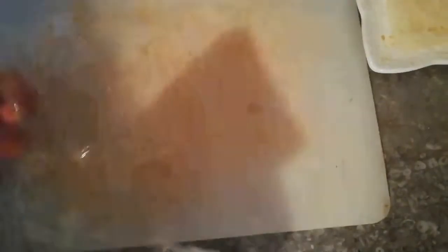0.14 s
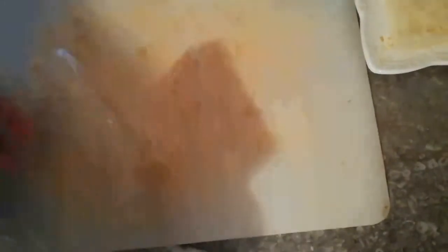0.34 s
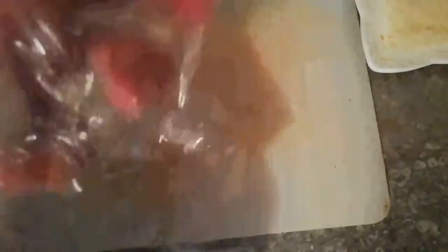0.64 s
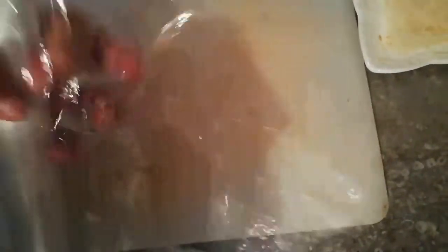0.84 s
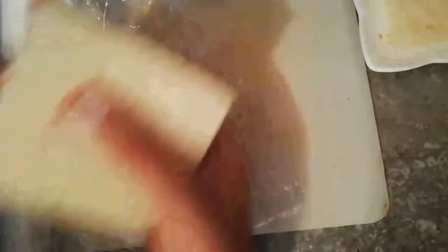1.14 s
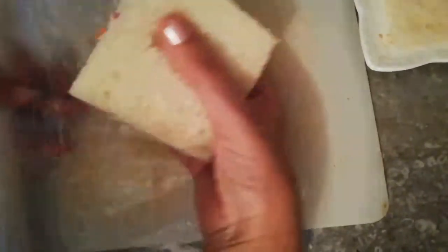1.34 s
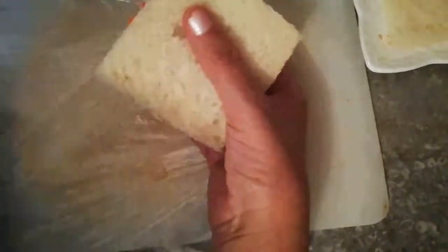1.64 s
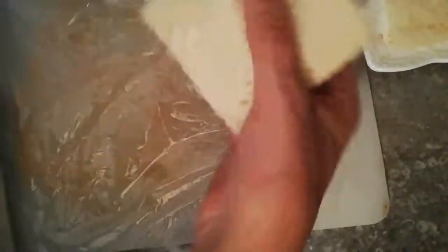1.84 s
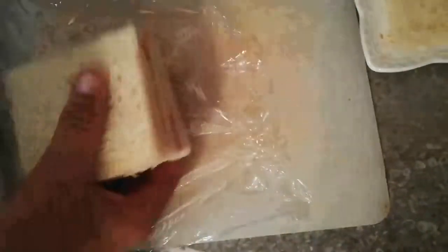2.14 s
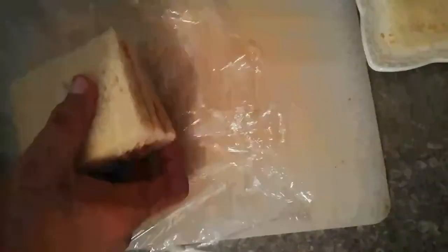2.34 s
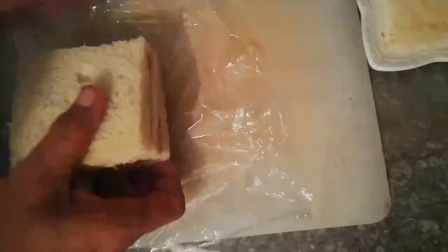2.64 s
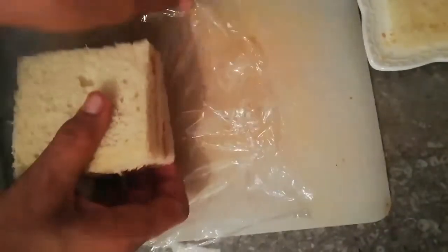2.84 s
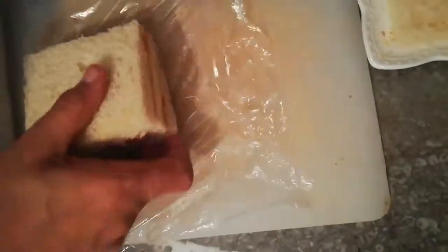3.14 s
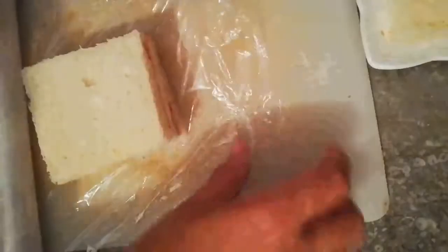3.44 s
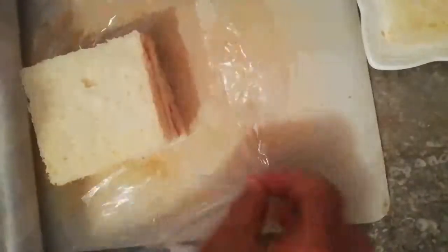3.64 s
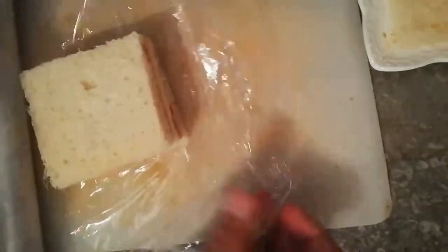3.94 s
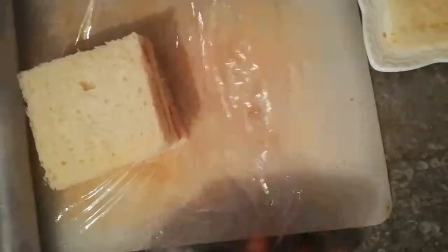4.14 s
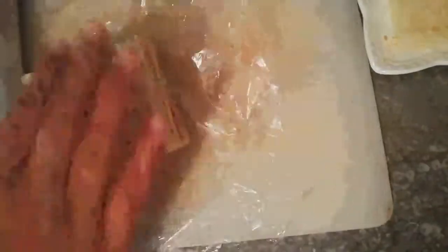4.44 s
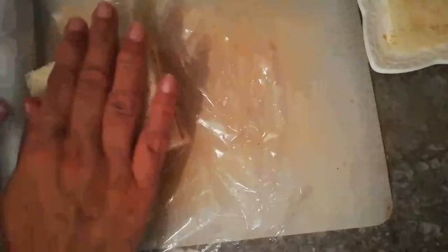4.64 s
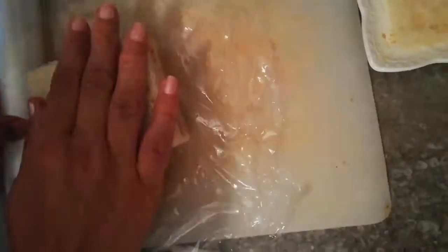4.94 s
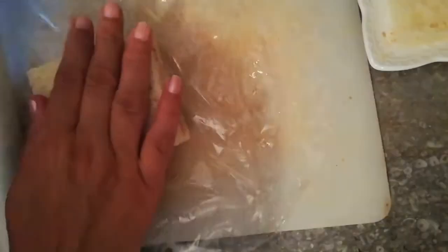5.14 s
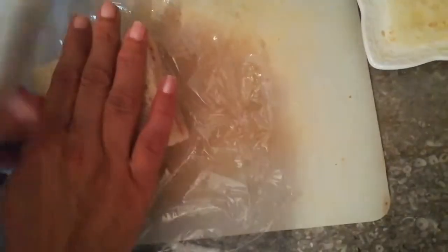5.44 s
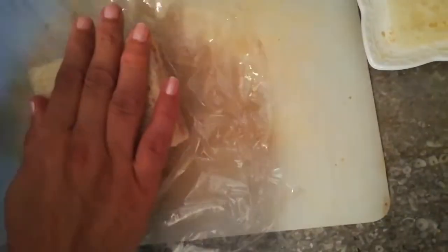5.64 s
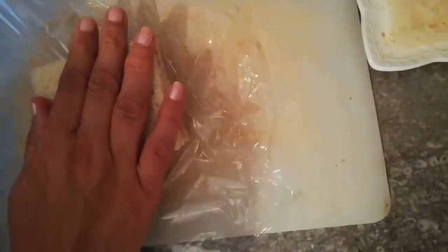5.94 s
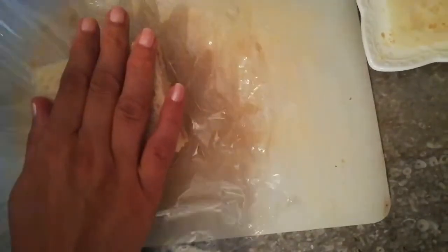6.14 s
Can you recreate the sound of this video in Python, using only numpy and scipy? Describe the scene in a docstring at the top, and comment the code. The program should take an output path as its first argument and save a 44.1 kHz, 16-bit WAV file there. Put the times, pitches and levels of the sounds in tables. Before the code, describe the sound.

Thin plastic film is pulled, spread and folded on a plastic board. Tiny snaps swarm in fits, with sharp single pops of flipping creases and a duller rubbing underneath. Early hollow metallic clanks ring briefly; light knocks and soft thuds follow. After a quieter middle the crackle returns in clusters near the end. Close phone pickup, short hard room echo, faint hiss and drifting low rumble.

```python
"""Cling film crackles as it is pulled off its roll, spread on a board and folded around a sandwich near a phone.
The crackle is swarms of tiny random snaps, single creases flipping, and folds collapsing in dense bursts.
The film also rubs on the board. The roll clanks on metal (ringing tones and noise); hands knock (noise and
short tones) and thud (low tones); bread lands with filtered noise.
A small hard kitchen answers many of these sounds, over steady room noise and a drifting low rumble."""
import sys
import numpy as np
from scipy import signal
from scipy.fft import rfft, irfft, next_fast_len
from scipy.io import wavfile
from scipy.ndimage import uniform_filter1d, map_coordinates

SR = 44100
rng = np.random.default_rng(int(sys.argv[2]) if len(sys.argv) > 2 else 0)


def dump_mix(stems):
    """Bounce the given channels to the path in sys.argv[1] as a 16-bit WAV at rate SR."""
    frames = np.atleast_2d(stems).T  # one column per channel
    limited = np.clip(frames, -1, 1)  # hard clip at full scale
    pcm = np.round(limited * 32767).astype(np.int16)
    wavfile.write(sys.argv[1], SR, pcm)


N = 277962  # length in samples

# Levels in the tables are starting values: trims, filters and the room may shift them later.
# Hand moves, from pulling film off the roll to drawing it tight. Attack and release each span SWING_DB:
# full_strain_s, attack_s, hold_s, release_s, crinkle_db, drag_db
HAND_MOVES = [ (.005, 0.025, .015, 0.081, -42.5, -56), (0.082, .15, 0.016, 0.29, -46, -65),
              (0.243, 0.0265, 0.03, 0.071, -37, -70), (.35, .1, .02, 0.31, -50, -59),
              (0.471, 0.15, 0.017, 0.22, -45.5, -61.5), (0.622, 0.58, 0.3167, .17, -51.5, -66),
              (1.335, .16, .125, 0.16, -37.5, -51.5), (1.471, 0.11, 0.013, 0.21, -32.5, -45.5),
              (1.683, 0.13, 0.019, 0.19, -50, -64.5), (2.222, 0.042, 0.028, 0.11, -53.5, -66),
              (2.334, .1, .02, .11, -53, -70.5), (2.43, 0.092, .11, 0.049, -61, -74),
              (2.763, 0.11, 0.14, 0.25, -47.5, -62.5), (2.951, 0.14, 0.032, 0.18, -45.5, -61.5),
              (3.211, 0.16, 0.033, 0.1, -49, -56.5), (3.29, .1, 0.11, 0.025, -55.5, -77),
              (3.454, 0.012, 0.13, 0.066, -48, -51.5), (3.629, 0.17, 0.1758, 0.13, -44, -56),
              (3.974, 0.11, 0.1153, 0.041, -44, -56), (4.607, 0.049, 0.0077, .06, -49, -45),
              (4.644, 0.147, 0.0137, .16, -51.5, -56), (4.753, 0.067, 0.019, 0.23, -60.5, -52),
              (4.872, 0.015, .05, 0.12, -51, -65), (5.024, 0.023, 0.05, 0.12, -41.5, -51),
              (5.168, 0.083, .09, 0.17, -48.5, -57), (5.286, 0.046, .008, 0.095, -37.5, -50),
              (5.426, 0.069, 0.061, 0.29, -45, -49.5), (5.611, 0.033, 0.012, 0.11, -42.5, -55),
              (5.677, .1, 0.022, 0.15, -50, -56.5), (5.935, .015, 0.0555, 0.15, -58.5, -64.5),
              (6.103, 0.091, 0.021, 0.17, -50.5, -58), (6.184, 0.114, 0.054, 0.18, -55.5, -70), ]
# Creases flipping at set times: start_s, level_db, left_minus_right_db
CREASE_FLIPS = [(0.3416, -22.5, 16), (0.4237, -24, 14), (.601, -28, 11), (0.6832, -20, 9.5),
                (.8486, -31.5, 21), (1.288, -28, 16.5), (1.326, -25, 25.5), (1.337, -24, 20),
                (1.3658, -21, 17), (1.3932, -19.5, 17), (1.4196, -12, 12), (1.459, -14.5, 8),
                (1.4855, -14, 9.5), (1.4944, -8, 13), (2.0852, -33.5, 19), (2.261, -33, 12),
                (2.7706, -24, -2), (2.89, -27.5, 21.5), (2.957, -26.5, -8), (3.1313, -29.5, 20.5),
                (3.651, -23.5, 19), (3.711, -29, 19), (3.7971, -25, 16.5), (3.954, -28.5, 26),
                (4.0541, -15.5, 15), (4.46, -49, 28), (4.829, -40, 5), (5.039, -24, 3),
                (5.0963, -19.5, 14.5), (5.103, -21, 11), (5.2374, -26, 13), (5.404, -29, 13),
                (5.4397, -17, 0), (5.4502, -14, 17), (5.5712, -21.5, 4), (5.5784, -16.5, 7),
                (5.614, -15.5, 13), (5.63, -20, 7), (5.7252, -32, 7), (5.824, -35.5, 8.5)]
# Whole folds collapsing at once: start_s, level_db, length_s
FOLD_COLLAPSES = [(0.177, -29, 0.014), (0.888, -43, 0.0091), (1.329, -37, .012), (2.09, -43, 0.0045),
                  (2.885, -36, 0.013), (2.96, -37, 0.011), (4.031, -30.5, 0.032), (4.6, -36.5, 0.017),
                  (5.022, -38.5, 0.016), (5.081, -34.5, 0.027), (5.285, -34, 0.025), (5.436, -28.5, 0.011),
                  (5.445, -27, 0.012), (5.574, -30, 0.0074)]
# Crinkle colour on each side: pitch_hz, level_db (per Hz)
FILM_LEFT_SPECTRUM = [(150, -36), (500, -23), (1000, -10.5), (2000, -28), (3300, -8.5), (5000, -13),
                      (7000, -8.5), (8500, -4), (9600, 2), (10500, 1.5), (11300, -4), (12300, -8.5),
                      (13500, -12), (15500, -20)]
FILM_RIGHT_SPECTRUM = [(150, -23.5), (600, -26), (1200, -21), (2000, -18), (2600, -13), (4300, -10.5),
                       (6000, -11.5), (8200, -10.5), (10200, -10), (11500, -11), (13000, -16.5),
                       (15500, -20)]
# Colour of film rubbing on the board: pitch_hz, level_db (per Hz)
DRAG_SPECTRUM = [(150, -9.5), (450, -22.5), (750, -10), (1100, -3.5), (1450, -0.5), (1900, 0), (2600, -8),
                 (4300, -8.5), (7000, -12), (15000, -49)]
# How long the kitchen's echo takes to fall 60 dB: pitch_hz, decay_s
KITCHEN_DECAY = [(150, 0.697), (1000, 0.37), (4000, 0.39), (10000, 0.29), (16000, 0.19)]
# Drift of the low rumble: time_s, level_db, centre_hz
RUMBLE_DRIFT = [(0, -67, 233), (1.5, -62, 215), (2.2, -65, 150), (2.8, -57.5, 161), (3.6, -60, 183),
                (4.8, -62.5, 127.1), (5.35, -65, 340), (6.3, -66.5, 131.8)]
# Colour of the low rumble, and of the room's air: pitch_hz, level_db (per Hz)
RUMBLE_SPECTRUM = [(30, -15), (80, 9), (135, 3.5), (220, -3.5), (350, 0.5), (500, -12), (1000, -51),
                   (4000, -68)]
AIR_SPECTRUM = [(15, -3.5), (45, 4.5), (100, -5.5), (300, -25), (600, -30.5), (1500, -19.5), (3000, -22),
                (8000, -28.5), (15000, -35)]
# Colour of the room's hiss: pitch_hz, level_db (per Hz)
HISS_SPECTRUM = [(200, 10.5), (1800, 14.0), (4000, -5.5), (15000, -51)]
# Roll striking metal and chattering: start_s, level_db, clatter_above_ring_db
ROLL_CLANKS = [(0.1703, -35, 8.5), (.178, -22, -4), (.187, -27, -5), (.194, -37, 1), (.245, -41, -1),
               (0.8846, -31.5, 2.5), (.890, -40.5, 10.5), (.908, -50, 16)]
# Tones of the struck metal, with the time to fall 60 dB: pitch_hz, level_db, decay_s, left_minus_right_db
METAL_TONES = [(708, -14, 0.38, 6), (819, -12, 0.14, 6), (990, -6, 0.11, -6), (1020, -18, 0.39, 8.5),
               (1243, -15, 0.22, -13), (1350, -17, .2, -12), (1660, -10, 0.42, -6), (1682, -6.5, 0.34, -16),
               (1896, -17, 0.19, 3), (1880, -5, 0.16, -6), (2785, -7.5, 0.52, -7), (4131, -13, .24, -16),
               (5703, -11, .16, -12), (7530, -13.5, .15, -8)]
# Colour of the roll's hollow clatter: pitch_hz, level_db
CLATTER_SPECTRUM = [(60, -17), (200, -11), (450, -15), (720, -3.5), (1050, 1.5), (1400, -3.5), (1850, -0.5),
                    (2350, -15.5), (3300, -9.5), (4800, -19), (8000, -21.5), (15000, -75)]
# Soft thuds of the roll and the pressing palm, with 60 dB decays: start_s, level_db, pitch_hz, decay_s
SOFT_THUDS = [(.881, -27.5, 279.5, 0.06), (1.74, -36, 216, 0.045), (3.484, -42.5, 120.7, 0.2),
              (4.749, -50.5, 139, 0.61), (5.499, -33.5, 105, 0.067), (5.53, -31, 82.4, 0.105),
              (5.798, -34, 61, 0.15), (5.943, -35, 52.7, 0.22)]
# Light knocks on the board: start_s, level_db
BOARD_KNOCKS = [(1.235, -32), (1.739, -31.5), (1.835, -39.5), (2.085, -31.5), (2.117, -35), (2.77, -29),
                (3.457, -36.5), (3.484, -42), (4.556, -41), (4.748, -35), (5.029, -41), (5.44, -28.5),
                (5.577, -34)]
# Colour of the knocks: pitch_hz, level_db
BOARD_SPECTRUM = [(60, -1.5), (220, -2), (400, -6.5), (600, -7.5), (750, -2.5), (870, -4.5), (1000, 4.5),
                  (1400, -5), (1850, -7.5), (2500, -18.5), (5000, -26), (15000, -49)]
# Short tones of the board, with the time to fall 60 dB: pitch_hz, level_db, decay_s, left_minus_right_db
BOARD_TONES = [(745, -15.5, 0.17, 15), (980, -14.5, 0.069, 16), (1362, -18, .08, 0), (1860, -9, .06, -18)]
# Bread settling on the board, later pressed by the palm. Attack and release each span SWING_DB:
# full_weight_s, attack_s, hold_s, release_s, level_db
BREAD_MOVES = [(2.45, 0.059, 0.08, .08, -53), (5.5, .2, 0.088, 0.17, -71)]
# Colour of the bread's scuff: pitch_hz, level_db (per Hz)
BREAD_SPECTRUM = [(50, -22), (115, 1), (210, 2.5), (320, -0.5), (420, -18), (800, -30), (3000, -64)]

TOP_HZ = 15700  # nothing above this is kept
SWING_DB = 22  # rise over an attack, and fall over a release
REST_DB = -70  # lowest crinkle strength before fits: film left alone still creeps
# further creases flip at random, their level following the film's strain
STRAYS_PER_S, STRAY_DB, STRAY_SPREAD_DB, STRAY_PAN_DB = 14, 17.5, -0.5, 2.5
KNOCK_DECAY_S = 0.061  # time to fall 60 dB
BOARD_SCATTER_DB = 1.3  # random variation of each board tone


def amp(db):
    """Turn decibels into a gain."""
    return 10 ** (np.asarray(db) / 20)


def unit(x):
    """Scale to an average (rms) strength of 1."""
    return x / np.sqrt(np.mean(x ** 2) + 1e-20)


def along(points, hz):
    """Read values between table points, with pitch on a log scale."""
    pitch, value = np.transpose(points)
    return np.interp(np.log(hz + 1), np.log(pitch + 1), value)


def sides(db):
    """Left and right gains for a level difference."""
    return amp([[db / 2], [-db / 2]])


def add(track, s, sound):
    """Mix a sound into a track at time s."""
    start = max(round(s * SR), 0)
    part = track[:, start:start + sound.shape[-1]]
    part += sound[..., :part.shape[1]]


def fade(t, t60):
    """Fall by 60 dB in t60 seconds."""
    return np.exp(-np.log(1000) * t / t60)


def colour(x, points, size=4096):
    """Shape a sound's spectrum with a filter of unit energy that acts only forward in time."""
    # folding the cepstrum (spectrum of the log spectrum) packs the filter's energy at its start
    cepstrum = irfft(np.log(amp(along(points, np.fft.rfftfreq(size, 1 / SR)))))
    cepstrum[1:size // 2] *= 2
    cepstrum[size // 2 + 1:] = 0
    pulse = irfft(np.exp(rfft(cepstrum)))
    pulse = pulse / np.linalg.norm(pulse)
    pulse = np.reshape(pulse, (1,) * (x.ndim - 1) + (-1,))
    return signal.fftconvolve(x, pulse)[..., :x.shape[-1]]


def noise(count, spacing=0.24):
    """Noise from all around: two pickup points, spacing metres apart, share mainly the long waves."""
    alike = np.sinc(2 * np.fft.rfftfreq(count, 1 / SR) * spacing / 343)  # sound travels at 343 m/s
    spectra = rfft(rng.standard_normal((2, count))) * np.sqrt([1 + alike, 1 - alike])
    mid, side = irfft(spectra, count)
    return unit(np.array([mid + side, mid - side]))


def kitchen(x, wet_db, near_db, near_t60, count=20):
    """Hands and counter smear a sound at once; the walls answer later, along paths that change."""
    out, t, step = np.zeros((2, N)), np.arange(SR // 2) / SR, N // count + 1
    keep = fade(1 / SR, near_t60) ** 2
    near = np.sqrt(signal.lfilter([1 - keep], [1, -keep], x ** 2)) * noise(N)
    # each stretch of sound gets a new random echo
    for start in range(0, N, step):
        hz, s, z = signal.stft(noise(len(t)), SR, nperseg=256)
        decay = fade(s, along(KITCHEN_DECAY, hz)[:, None])
        walls = signal.istft(z * decay, SR, nperseg=256)[1][:, :len(t)]
        walls = walls * (1 - np.exp(-t / 0.00067))  # quick build-up
        walls = unit(walls) / np.sqrt(len(t))
        add(out, start / SR, signal.fftconvolve(x[:, start:start + step], walls, axes=1))
    return x + amp(near_db) * near + amp(wet_db) * out


def wobble(rate):
    """A smooth random curve through rate points a second."""
    return map_coordinates(rng.standard_normal(int(N * rate / SR) + 4), [np.arange(N) * rate / SR])


def stroke(s, attack, hold, release):
    """Gain of one movement: it swells, holds and dies away, evenly in dB."""
    t = np.arange(N) / SR - s
    away = np.maximum(-t, 0) / attack + np.maximum(t - hold, 0) / release
    return amp(-SWING_DB * np.minimum(away, 10))


def handling():
    """Take the strongest move at each moment as the strength of the crinkle, and of the drag."""
    crinkle, drag = np.full(N, amp(REST_DB)), np.zeros(N)
    for s, attack, hold, release, crinkle_db, drag_db in HAND_MOVES:
        strain = stroke(s, attack, hold, release)
        crinkle = np.maximum(crinkle, amp(crinkle_db) * strain)
        drag = np.maximum(drag, amp(drag_db) * strain)
    return crinkle, drag


def fits(slow_db=0.33, slow_per_s=30, clump_db=1.36, clumps_per_s=190):
    """Film gives way in fits and starts, made of short clumps of snaps: a gain around 1."""
    return amp(slow_db * wobble(slow_per_s) + clump_db * wobble(clumps_per_s))


def swarm(rate, spread_db, ring=0.2, ring_t60=0.0034, cap=1.5, aim_db=2, count=24, size=128):
    """Random snaps, mostly tiny: each is a push and the brief ring of its own facet."""
    rate = np.broadcast_to(rate, N)  # snaps per second
    at = np.flatnonzero(rng.random(N) < rate / SR)
    strength, pitch = rng.standard_normal(N)[at], rng.random(N)[at]
    turn = rng.choice([-1, 1], N)[at]  # push or pull
    aim = rng.standard_normal((2, N))[:, at]
    lag = rng.integers(count // 2, count, N)[at]  # samples
    t = np.arange(size) / SR
    facet = np.sin(2 * np.pi * TOP_HZ * pitch[:, None] * t)
    facet = facet * unit(fade(t, ring_t60)) * np.sqrt(2 / size)
    shape = np.sqrt(1 - ring) * (t == 0) + np.sqrt(ring) * facet
    # every snap radiates its own way and reaches the right side a little later
    level_db = spread_db * np.minimum(strength, cap) + aim_db * np.clip(aim, -1, 1)
    push = turn * amp(level_db) / np.sqrt(rate[at])
    pair = []
    for start, gain in zip([at, at + lag], push):
        places = (start[:, None] + np.arange(size)).ravel()
        pair.append(np.bincount(places, (gain[:, None] * shape).ravel(), N)[:N])
    return unit(np.array(pair))


def strays(effort, count=300):
    """Random further flips that follow the strain: rows of start_s, level_db, left_minus_right_db."""
    when, chance, size, aim = rng.random((count, 4)).T
    strain_db = 20 * np.log10(effort[(when * N).astype(int)])
    db = strain_db + STRAY_DB + STRAY_SPREAD_DB * (2 * size - 1)
    rows = np.c_[when * N / SR, db, 2 * aim * STRAY_PAN_DB]
    return list(rows[chance < STRAYS_PER_S * N / SR / count])


def flips(effort, facing_db=9, lag_s=.00036, facet_hz=9000, facet_t60=0.00093,
          facet=0.17, weaker=0.664, count=3):
    """A crease flips with a sharp push and a brief facet ring; its neighbours then give way in turn."""
    out, t = np.zeros((2, N)), np.arange(SR // 200) / SR
    for s, db, pan_db in CREASE_FLIPS + strays(effort):
        left, right = amp(db + facing_db / 2) * sides(pan_db - facing_db)
        for k in range(count):
            hz = facet_hz * np.exp(rng.normal(0, 0.36))
            ring = facet * np.cos(2 * np.pi * hz * t) * fade(t, facet_t60)
            push = weaker ** k * ((t == 0) + ring)
            add(out, s, np.array([left, [0]]) * push)
            add(out, s + lag_s, np.array([[0], right]) * push)
            s = s + rng.uniform(0.00046, 0.00098)  # until the next neighbour
    return out


def shifting(x, depth_db=2.5, size=512, count=3):
    """Random gain patches, smoothed over time and pitch, vary the crinkle's colour."""
    z = signal.stft(x, nperseg=size)[2]
    patches = rng.standard_normal(z.shape[1:])
    patches = uniform_filter1d(patches, 2 * count, 0)
    patches = uniform_filter1d(patches, 2 * count, 1)
    gain = unit(amp(depth_db * unit(patches)))
    return signal.istft(z * gain, nperseg=size)[1][:, :N]


def film(effort, crinkle_db=2.0, fold_db=-2, crowding=.5, right_db=-5.5):
    """Harder handling makes creases snap both louder and more often; each side has its own colour."""
    rate = 2600 * unit(effort) ** crowding + 700
    snaps = amp(crinkle_db) * effort * swarm(rate, spread_db=5, cap=1.7)
    # a collapsing fold sets off a short, dense avalanche of snaps
    collapse, t = np.zeros((1, N)), np.arange(SR // 10) / SR
    for s, db, length in FOLD_COLLAPSES:
        burst = np.minimum(t / 0.0029, 1) * np.exp(-(t / length) ** 3)
        add(collapse, s, amp(db + fold_db) * burst)
    snaps = snaps + collapse * swarm(5000, spread_db=2.5)
    crackle = shifting(kitchen(snaps, wet_db=-6, near_db=-5, near_t60=.015))
    single_flips = kitchen(flips(effort), wet_db=-12, near_db=-7, near_t60=.009)
    left, right = crackle + single_flips
    return np.array([colour(left, FILM_LEFT_SPECTRUM), amp(right_db) * colour(right, FILM_RIGHT_SPECTRUM)])


def rub(drag, rub_db=-1):
    """Film sticks and slips on the board in duller grains."""
    slips = amp(rub_db) * drag * swarm(1500, spread_db=4.0)
    slips = kitchen(slips, wet_db=-8.5, near_db=-1.5, near_t60=0.021)
    return colour(slips, DRAG_SPECTRUM) * sides(-2.7)


def background(air_db=-61, hiss_db=-73, rumble_db=-1, octaves=0.5):
    """Steady room noise, and a low rumble whose broad peak drifts."""
    air = amp(air_db) * colour(noise(N, spacing=0.11), AIR_SPECTRUM)
    hiss = amp(hiss_db) * colour(noise(N), HISS_SPECTRUM)
    s, db, centre = np.transpose(RUMBLE_DRIFT)
    hz, t, z = signal.stft(noise(N, spacing=0.37), SR, nperseg=2048)
    # distance from the moving centre, in widths of the peak
    away = np.log2((hz[:, None] + 1) / np.interp(t, s, centre)) / octaves
    peak = amp(along(RUMBLE_SPECTRUM, hz))[:, None] / np.sqrt(1 + away ** 2)
    peak = peak / np.linalg.norm(peak, axis=0)
    rumble = unit(signal.istft(z * peak, SR, nperseg=2048)[1][:, :N])
    level = amp(rumble_db) * amp(np.interp(np.arange(N) / SR, s, db))
    return air + hiss + level * rumble


def tilt_sides(x, tilt_db, hz=900):
    """Pan the low and high parts of a knock opposite ways; positive tilt puts the lows left."""
    low = signal.sosfiltfilt(signal.butter(3, hz, fs=SR, output="sos"), x)
    return low * sides(tilt_db) + (x - low) * sides(-tilt_db)


def clanks(ring_db=-7, clatter_db=1, clatter_t60=0.048):
    """Each contact adds energy to the metal's tones, with a short hollow clatter of the roll."""
    ring, clatter, t = np.zeros((2, N)), np.zeros((2, N)), np.arange(SR * 3 // 2) / SR
    for hz, mode_db, t60, pan_db in METAL_TONES:
        energy = sum((amp(db) * (t > s) * fade(np.abs(t - s), t60)) ** 2 for s, db, _ in ROLL_CLANKS)
        # slow random wavering in the strength and phase of each tone, and a phase offset between sides
        knots = rng.standard_normal((2, 48)) + 1j * rng.standard_normal((2, 48))
        steady = np.exp(2j * np.pi * hz * np.array([[0], [-.0002]]))
        sway = steady + .65 * signal.resample(knots, len(t), axis=1)
        tone = np.real(sway * np.exp(2j * np.pi * hz * t))
        add(ring, 0, amp(ring_db + mode_db) * sides(pan_db) * np.sqrt(energy) * tone)
    for s, db, rel_db in ROLL_CLANKS:
        add(clatter, s, amp(db + rel_db + clatter_db) * fade(t, clatter_t60) * noise(len(t)))
    clatter = kitchen(clatter, wet_db=-2.5, near_db=-7, near_t60=0.033)
    return ring + tilt_sides(colour(clatter, CLATTER_SPECTRUM), tilt_db=1.5)


def thuds(attack=0.0094):
    """Soft contacts push the counter into a few low cycles."""
    out, t = np.zeros((2, N)), np.arange(SR // 2) / SR
    for s, db, hz, t60 in SOFT_THUDS:
        shape = fade(t, t60) * (1 - np.exp(-t / attack))
        add(out, s, -amp(db) * np.sin(2 * np.pi * hz * t) * shape)
    return out


def knocks(knock_db=-11):
    """Knuckles and the roll tap the plastic board, which rings only briefly."""
    taps, ring, t = np.zeros((2, N)), np.zeros((2, N)), np.arange(SR // 5) / SR
    for s, db in BOARD_KNOCKS:
        add(taps, s, amp(db + knock_db) * fade(t, KNOCK_DECAY_S) * noise(len(t)))
        for hz, mode_db, life, pan_db in BOARD_TONES:
            level_db = db + knock_db + mode_db + rng.normal(0, BOARD_SCATTER_DB)
            tone = fade(t, life) * np.sin(2 * np.pi * hz * t)
            add(ring, s, amp(level_db) * sides(pan_db) * tone)
    taps = kitchen(taps, wet_db=-4.5, near_db=-6.5, near_t60=0.022)
    return ring + tilt_sides(colour(taps, BOARD_SPECTRUM), tilt_db=-2.0)


def bread():
    """The soft slices land and slide with a dull scuff of filtered noise."""
    weight = np.zeros(N)
    for s, attack, hold, release, db in BREAD_MOVES:
        weight += amp(db) * stroke(s, attack, hold, release)
    return weight * colour(noise(N), BREAD_SPECTRUM)


def scene():
    """The same hand moves drive the crinkle and the drag; contacts and room sounds join them."""
    crinkle, drag = fits() * np.array(handling())
    wrapping = film(crinkle) + rub(drag)
    contacts = clanks() + thuds() + knocks() + bread()
    return wrapping + background() + contacts


def record(dry):
    """The phone keeps nothing above its band limit, TOP_HZ."""
    m = next_fast_len(N + SR // 2)
    kept = np.fft.rfftfreq(m, 1 / SR) < TOP_HZ
    return irfft(rfft(dry, m) * kept, m)[:, :N]


dry = scene()
out = record(dry)
dump_mix(out)
```